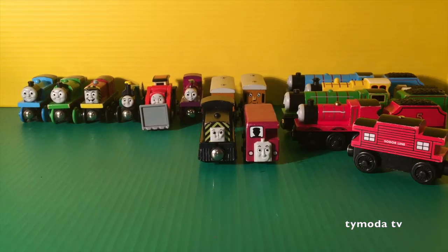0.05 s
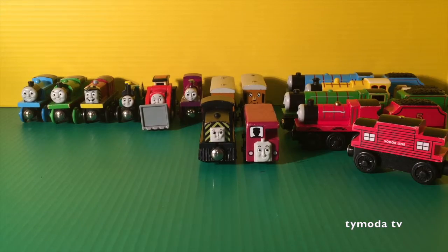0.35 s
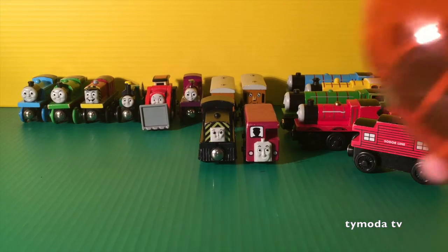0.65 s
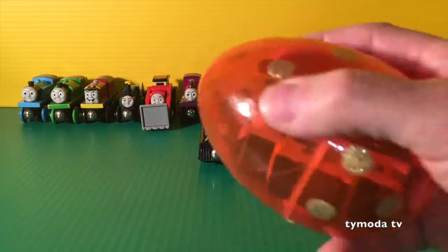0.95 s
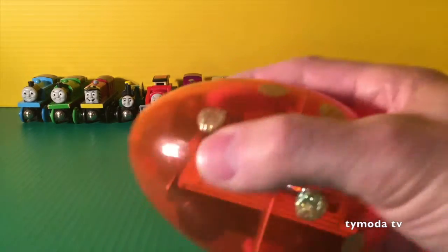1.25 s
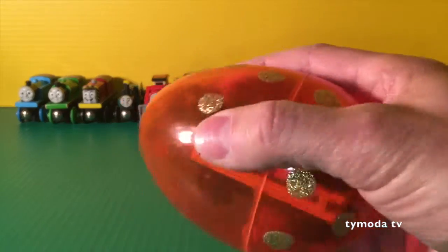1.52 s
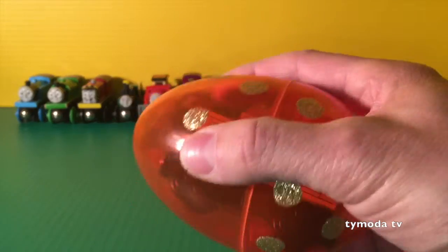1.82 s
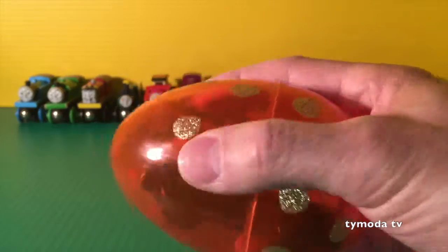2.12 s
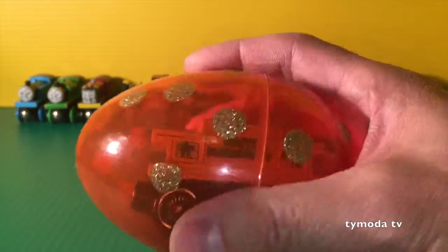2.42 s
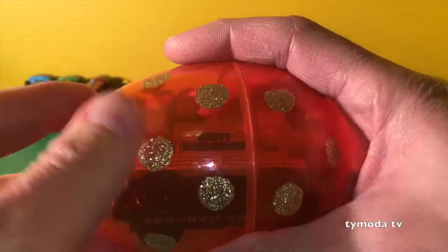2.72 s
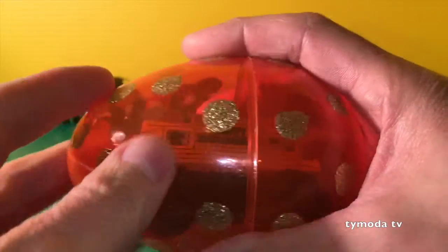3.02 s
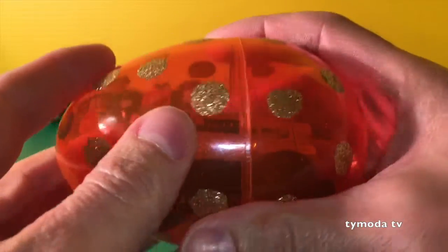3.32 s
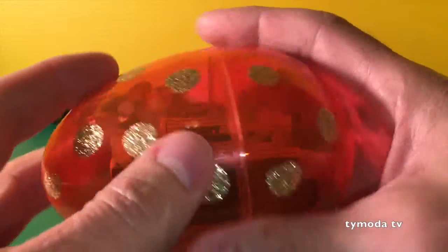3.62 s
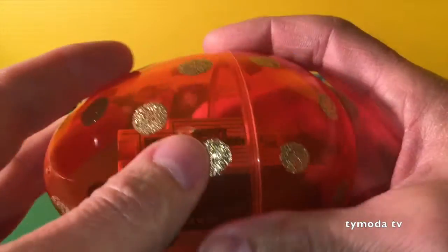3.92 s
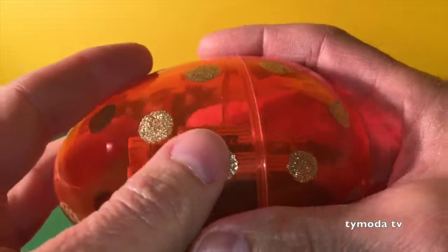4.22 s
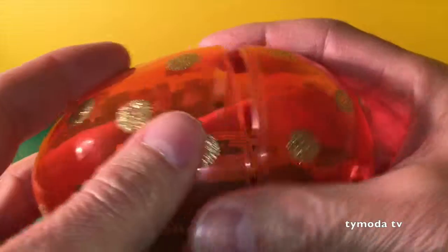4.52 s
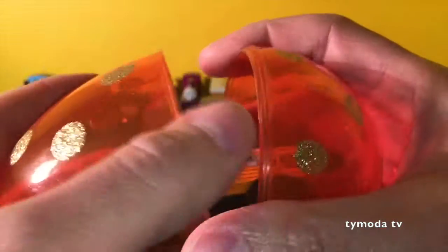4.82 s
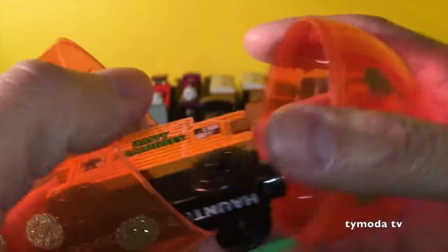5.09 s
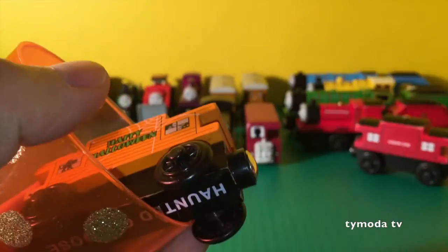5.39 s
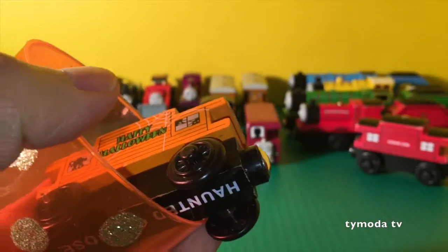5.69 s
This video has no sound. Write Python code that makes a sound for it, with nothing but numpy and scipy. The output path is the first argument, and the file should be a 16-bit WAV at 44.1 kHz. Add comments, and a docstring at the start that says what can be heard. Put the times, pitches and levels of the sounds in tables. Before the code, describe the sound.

A wooden toy car knocks a few times inside a large plastic egg, then rattles hard for about a second as the egg is shaken. Fingers slide quietly over the shell until the seam lets go with a thump and the halves separate with a hollow, rising pop and a second small pop. A few faint clicks follow. Everything is heard up close in a small room with a faint hum.

```python
"""Close by in a small, faintly humming room, fingers stroke a big plastic egg with a wooden toy car inside.
Hands shake it: the car lands on the hollow shell corner by corner, making it ring, and skids along it.
From about 2.7 s there is mostly the rub of skin on plastic, with a few soft knocks.
At 4.4 s the seam gives with a thump, then the halves part with a hollow rising pop.
Last, the car shifts as one half is taken away."""
import sys
import numpy as np
from scipy import signal
from scipy.fft import rfft, irfft
from scipy.io import wavfile

SR = 44100
rng = np.random.default_rng(int(sys.argv[2]) if len(sys.argv) > 2 else 0)


def store_wav(level_fs):
    """Save 16-bit WAV to argv[1]."""
    pcm = np.round(np.clip(np.atleast_2d(level_fs), -1, 1) * 32767)
    wavfile.write(sys.argv[1], SR, pcm.T.astype(np.int16))


N = 253575
TIME = np.arange(N) / SR
BLOW_TIME = TIME[:4096]   # the seconds within one short knock


def from_db(db):
    """Turn decibels into a number to multiply a sound by."""
    return 10 ** (np.asarray(db) / 20)


def rms_one(x):
    """Scale a sound so that its average strength (rms) is 1."""
    return x / np.sqrt(np.mean(x ** 2) + 1e-20)


def dying(t, t60):
    """A fade that loses 60 dB in t60 seconds, the fade time."""
    return np.exp(-np.log(1000) * t / t60)


def add(track, s, sound):
    """Mix a sound into the track, starting at s seconds."""
    at = int(np.clip(s * SR, 0, N - 1))
    track[at:at + len(sound)] += sound[:N - at]


def colour_filter(points):
    """A click with the given colour: (f/Hz, level/dB) points that say how strong each pitch is."""
    hz, db = np.transpose(points)
    size = len(BLOW_TIME)
    grid = np.maximum(np.fft.rfftfreq(size, 1 / SR), 1)
    skirts = np.minimum(grid / hz[0], 1) ** 2 * np.minimum(hz[-1] / grid, 1) ** 2
    gain = from_db(np.interp(np.log(grid), np.log(hz), db)) * skirts
    # pack the energy at the very start of the click (minimum phase)
    cepstrum = irfft(np.log(gain + 1e-4))
    return irfft(np.exp(rfft(2 * cepstrum[:size // 2], size)))


def coloured(x, points):
    """Give a sound a colour and an average strength of 1."""
    return rms_one(signal.fftconvolve(x, colour_filter(points))[:N])


def drift(per_s):
    """A wandering line that heads for a new random value per_s times a second."""
    return np.interp(TIME * per_s, np.arange(4000), rng.standard_normal(4000))


def swell(events, attack_s, release_s):
    """A loudness curve that rises, holds and fades for each (t/s, length/s, level/dB) event."""
    power = np.zeros(N)
    for s, length, db in events:
        t = np.arange(-6 * attack_s, length + 6 * release_s, 1 / SR)
        shape = np.exp(np.minimum(t, 0) / attack_s - np.maximum(t - length, 0) / release_s)
        add(power, s + t[0], (from_db(db) * shape) ** 2)
    return np.sqrt(power)


def unit_blows(blows):
    """Scale each blow so that its energy, spread over 5 ms, is 0 dB."""
    return blows / np.sqrt(np.sum(blows ** 2, axis=-1, keepdims=True) / (.005 * SR))


# colour of the quiet room: f/Hz, level/dB
ROOM_TONE = [(30, -12), (60, 1.5), (130, -2.5), (210, -1), (330, -13.5), (600, -22), (1500, -23.5),
             (4000, -28), (6500, -33.5), (16000, -36)]

def room_tone(noise_db=-69.5, hum_db=-72.5, hum_hz=120):
    """The room's low, steady rush, with a faint hum from the mains."""
    hum = from_db(hum_db) * rms_one(np.sin(2 * np.pi * hum_hz * TIME))
    return from_db(noise_db) * coloured(rng.standard_normal(N), ROOM_TONE) + hum


# colours of dull rubbing, of fingertips and of the palm on plastic: f/Hz, level/dB
RUB = [(100, -11.5), (280, 0.5), (650, 1), (1000, 4), (1700, -5), (2500, -11.5), (5000, -31.5)]
FINGERTIP_HISS = [(1000, -17), (2300, -4), (3200, 1.5), (4000, 0.5), (4900, 0), (6300, 1.5), (7600, -7.5),
                  (10500, -10.5), (16000, -14)]
PALM_HISS = [(1800, -22.5), (3300, -6), (4500, -9), (6000, 1.5), (8000, -3.5), (10500, -4.5), (13000, -2.5),
             (16000, -5.5)]
# skin slides over the egg: t/s, length/s, rub level/dB, hiss level/dB, palm's share of the hiss (0-1)
STROKES = [(0.071, 0.065, -67.5, -65, 0), (0.168, 0.13, -66.5, -80, 0.3), (0.464, 0.051, -60, -68, 0),
           (0.563, 0.23, -56, -62.5, 0), (0.902, 0.035, -69, -71, 0), (1.231, 0.073, -54.5, -62.5, 0),
           (1.324, 1.13, -52, -57, 0), (2.518, 0.15, -60.5, -58, 0.12), (2.723, 0.078, -59, -67, 0),
           (2.888, 0.028, -56.5, -59, 0.1), (2.968, 0.047, -55, -56, 0.35), (3.029, 0.073, -63.5, -62.5, 0),
           (3.159, 0.042, -64.5, -54.5, 0.32), (3.225, 0.11, -62, -61.5, 0.1),
           (3.504, 0.038, -59.5, -55, 0), (3.624, 0.18, -63, -56.5, 0.06), (3.83, 0.055, -56.5, -56.5, 0.1),
           (3.948, 0.014, -62.5, -51, 0.18), (4.05, 0.011, -60.5, -54, 0.02),
           (4.392, 0.056, -54.5, -69, 0.06), (4.64, 0.047, -54.5, -53, 0), (4.874, 0.021, -71, -61, 0.4),
           (4.952, 0.038, -65, -61, 0.02), (5.198, 0.053, -63.5, -59, 0.11), (5.271, 0.16, -76.5, -58.0, 1),
           (5.727, 0.04, -58, -59.5, 0)]

def fingers(rub_rough_db=4, hiss_rough_db=2, catch_db=3):
    """Fingertips stick and slip in tiny grains; the flat palm glides with a finer, brighter hiss."""
    s, length, rub_db, hiss_db, palm_share = np.transpose(STROKES)
    palm_share = np.clip(palm_share, 1e-6, 1 - 1e-6)
    tips_db = hiss_db + 10 * np.log10(1 - palm_share)
    palm_db = hiss_db + 10 * np.log10(palm_share)
    rub_gain, tips_gain, palm_gain = (swell(zip(s, length, db), attack_s=.0055, release_s=.016)
                                      for db in (rub_db, tips_db, palm_db))
    # the hands never lie quite still, so a little rub and hiss is always there
    rub_gain = np.hypot(rub_gain, from_db(-78.5))
    tips_gain = np.hypot(tips_gain, from_db(-81))
    rub = coloured(rng.standard_normal(N) * from_db(rub_rough_db * drift(280)), RUB)
    grains = rng.standard_normal(N) * from_db(hiss_rough_db * drift(700) + catch_db * drift(90))
    tips = coloured(grains, FINGERTIP_HISS)
    palm = coloured(rng.standard_normal(N), PALM_HISS)
    skin = rub_gain * rub + tips_gain * tips + palm_gain * palm
    # a bounce off the cupped hand, whose path keeps changing, shifts the colour
    bounce_s = .0005 * from_db(1.5 * drift(5))
    return skin + .4 * np.interp(TIME - bounce_s, TIME, skin)


def damped_tones(tones, scatter_db, soft_hz, detune=.08):
    """One short ring per knock; the spot hit and the hand's grip change each tone's level and pitch."""
    ring = 0
    for hz, db, t60 in tones:
        chance = rng.standard_normal((len(KNOCKS), 2))
        pitch = hz * (1 + detune * chance[:, :1])
        gain = from_db(db + scatter_db * chance[:, 1:])
        ring = ring + gain * np.sin(2 * np.pi * pitch * BLOW_TIME) * dying(BLOW_TIME, t60)
    # a small body sounds by changing speed; the time the contact takes rounds the edge
    soften = signal.butter(2, [58, soft_hz], "band", fs=SR, output="sos")
    return signal.sosfilt(soften, np.diff(ring, prepend=0))


def cracks(points, t60, snap, scatter_db=2.5):
    """One crack per knock: a sharp edge, then a blur of shell tones, coloured anew by each spot hit."""
    bursts = rng.standard_normal((len(KNOCKS), len(BLOW_TIME))) * dying(BLOW_TIME, t60)
    bursts[:, 0] += snap
    hz, db = np.transpose(points)
    colours = db + scatter_db * rng.standard_normal((len(KNOCKS), len(hz)))
    return np.array([signal.fftconvolve(burst, colour_filter(np.c_[hz, colour]))[:len(BLOW_TIME)]
                     for burst, colour in zip(bursts, colours)])


# tones of the whole egg, muffled by the palm, and of the air inside: f/Hz, level/dB, fade time/s
EGG_TONES = [(112, -11, 0.07), (216, -6.5, 0.0083), (281.3, 2, 0.026), (367, 4, 0.0085)]
AIR_TONES = [(608, 4.5, 0.039), (680, 2, 0.011), (888, 4, 0.014), (1116, -5.5, 0.037)]
# colours of the shell's clack and of the hard tick: f/Hz, level/dB
CLACK = [(800, -2), (1250, -2), (1500, 1), (1900, -3.5), (2400, -4.5), (2850, -2.5), (3400, -10),
         (4000, -13.5), (5200, -22.5)]
TICK = [(2800, -23.5), (4000, -4), (4800, 0.5), (5900, 2), (7000, -3.5), (8300, -7), (10500, -14.5),
        (13200, -14), (16000, -17.5)]

def corner_hits():
    """One corner of the car hits the shell: a thud, hollow knock, clack and tick for every knock."""
    thud = damped_tones(EGG_TONES, scatter_db=3, soft_hz=800)
    hollow = damped_tones(AIR_TONES, scatter_db=3.5, soft_hz=1900)
    clack = cracks(CLACK, t60=.02, snap=3)
    tick = cracks(TICK, t60=.017, snap=2)
    return unit_blows(np.array([thud, hollow, clack, tick]))


def landing(first, second, graze_db=-5.5):
    """One corner grazes the shell and the other follows with the car's weight."""
    lags = [int(delay * SR) for _, delay, *_ in KNOCKS]
    late = np.array([np.pad(blow, (lag, 0))[:len(BLOW_TIME)] for blow, lag in zip(second, lags)])
    return unit_blows(from_db(graze_db) * first + late)


# middle pitches of the thud, hollow knock, clack and tick: f/Hz
PART_HZ = [250, 750, 2100, 6500]
# the car lands on the shell: t/s, wait for the second corner/s,
# thud level/dB, hollow knock level/dB, clack level/dB, tick level/dB, ring of the spot hit f/Hz
KNOCKS = [(0.126,0.0031,-51.5,-55,-55.5,-62,548), (0.472,0.0029,-45,-47,-50,-51.5,790),
          (0.5536,0.0096,-42,-38,-30,-36.5,1620), (0.6304,0.0011,-34.5,-33.5,-23,-32.5,2250),
          (0.644,0.0014,-41,-35.5,-42,-39.5,1000), (0.6659,0.0014,-27.5,-36.5,-40,-44,590),
          (0.7044,0.0028,-33.5,-33,-39,-50,498), (0.739,0.0069,-50.5,-41.5,-42.5,-44.5,1320),
          (1.264,0.0035,-53.5,-54.5,-49,-48,5800), (1.317,0.0071,-53.5,-34.5,-21.5,-20.5,6330),
          (1.3471,0.0012,-34.5,-26,-28,-33,3040), (1.357,0.0057,-29,-25.5,-24.5,-27.5,1660),
          (1.427,0.001,-38,-41.5,-50,-45,615), (1.438,0.0046,-20,-13,-21.5,-18,883),
          (1.5173,0.0028,-26.5,-24.5,-29,-28.5,1960), (1.528,0.00097,-32.5,-29,-31.5,-33.5,1900),
          (1.5965,0.0053,-27,-21.5,-17.5,-17.5,1106), (1.6046,0,-30,-24,-29.5,-22,6020),
          (1.6711,0.00035,-25.5,-20.5,-23.5,-22.5,1070), (1.7505,0,-31,-34.5,-45.5,-37.5,5500),
          (1.7647,0.0021,-19.5,-16,-19,-17,5950), (1.8253,0.0004,-20.5,-22.5,-30.5,-30.5,630),
          (1.836,0.00024,-32.5,-27,-39,-34.5,620), (1.9193,0.0026,-23,-20.5,-28,-23,5550),
          (1.973,0.009,-39,-29.5,-26.5,-32.5,1430), (2.0014,0.0018,-17,-17.5,-19,-23,657),
          (2.032,0,-48.5,-42.5,-32,-37.5,1410), (2.091,0.0035,-22.5,-24,-24,-23,764),
          (2.13,0.0078,-48,-34.5,-32.5,-44,1700), (2.1642,0.003,-18,-18,-23.5,-24.5,618),
          (2.192,0.0029,-49.5,-44.5,-33,-33,5250), (2.259,0.0015,-25.5,-27,-24.5,-26,960),
          (2.268,0.003,-30.5,-26,-32,-36.5,950), (2.305,0.004,-42.5,-31.5,-26,-31.5,1620),
          (2.334,0.0001,-18,-18.5,-22.5,-28,652), (2.4295,0.0018,-36,-28.5,-40.5,-36,610),
          (2.4694,0.0033,-52,-43,-46.5,-54,1170), (2.592,0.0061,-33,-34.5,-42,-41,1140),
          (2.609,0.0026,-49,-41,-44,-47,1230), (2.724,0.0051,-28,-32,-46,-44.5,1425),
          (3.701,0.000015,-42,-45,-36,-69,2570), (3.73,0.0021,-42.5,-47.5,-67,-70,604),
          (3.756,0.0012,-41,-44.5,-52,-50,1600), (3.77,0.0032,-45,-49,-46,-54,6260),
          (3.917,0.0028,-58,-47.5,-51,-74,1790), (4.42,0.0014,-32,-36.5,-36,-44.5,3780),
          (4.979,0.0035,-46.5,-52,-60,-54,930), (5.208,0.0015,-68,-64,-46.5,-48.5,3310),
          (5.228,0.0008,-59,-53.5,-48,-51,1360), (5.715,0.0011,-54,-70,-55.5,-53,4100)]

def knocks(ring_db=-2):
    """Each knock is a landing on two corners, and the spot hit rings at a pitch of its own."""
    landings = [landing(first, second) for first, second in zip(corner_hits(), corner_hits())]
    track = np.zeros(N)
    for (s, delay, *levels, hz), parts in zip(KNOCKS, np.stack(landings, axis=1)):
        add(track, s, from_db(levels) @ parts)   # the four parts, each at its own level
        t60 = .027 * (1000 / hz) ** .4   # higher rings die sooner
        ring = unit_blows(np.sin(2 * np.pi * hz * BLOW_TIME) * dying(BLOW_TIME, t60))
        db_at_pitch = np.interp(np.log(hz), np.log(PART_HZ), levels)
        add(track, s + delay, from_db(db_at_pitch + ring_db) * ring)
    return track


def chatter(blows, per_s=380, settle_s=.0058, level_db=-16):
    """After each blow the car skitters over the shell in tiny uneven touches that soon settle."""
    treble = signal.sosfilt(signal.butter(2, 1200, "high", fs=SR, output="sos"), blows)
    keep = np.exp(-1 / (settle_s * SR))
    unrest = np.sqrt(signal.lfilter([1 - keep], [1, -keep], treble ** 2 + 1e-18))
    touches = (rng.random(N) < per_s / SR) * rng.standard_normal(N)
    return from_db(level_db) * unrest * (coloured(touches, CLACK) + coloured(touches, TICK))


# pitches at which the thin shell rings: f/Hz
SHELL_HZ = [615, 973, 1422, 1711, 2252, 2842, 2968, 3517, 3922, 4590, 5480, 6020, 6500, 7182, 8171, 9119,
            9515, 12543, 13027]

def shell_ring(blows, level_db=-7.5, db_per_octave=3.5, t60=.085):
    """The shell's own tones take up each blow and ring on, the higher ones a little more strongly."""
    t = TIME[:SR // 4]
    gains = from_db(level_db + db_per_octave * np.log2(SHELL_HZ / np.median(SHELL_HZ)))
    tones = sum(gain * np.cos(2 * np.pi * hz * t) for gain, hz in zip(gains, SHELL_HZ))
    fade = dying(t, t60)
    return signal.fftconvolve(blows, 2 * tones * fade / fade.sum())[:N]


# the car slides along the shell: t/s, length/s, level/dB
SKIDS = [(0.547,0.0099,-43), (0.621,0.0066,-45), (0.636,0.018,-37), (1.366,0.017,-34.5), (1.455,0.02,-38.5),
         (1.535,0.028,-44), (1.612,0.02,-41.5), (1.677,0.0038,-27.5), (1.692,0.016,-38),
         (1.778,0.039,-32.5), (1.858,0.02,-37.5), (1.926,0.007,-27), (1.986,0.016,-27),
         (2.099,0.0071,-33.5), (2.149,0.017,-29), (2.273,0.006,-36), (2.317,0.014,-38),
         (2.435,0.0043,-38.5)]

def skids(touches_per_s=800):
    """Wheels and edges scrape along the shell in a dense run of tiny touches."""
    touches = (rng.random(N) < touches_per_s / SR) * rng.choice([-1, 1], N) * rng.uniform(.3, 1, N)
    scrape = sum(from_db(db) * coloured(touches, colour)
                 for db, colour in [(-6, RUB), (-2.5, CLACK), (-6.5, TICK)])
    return swell(SKIDS, attack_s=.00095, release_s=.0028) * scrape


# the seam gives way: t/s, level/dB, f/Hz, fade time/s, swell time/s
POPS = [(4.4202, -18, 160, 0.051, 0.004), (4.426, -23.5, 94.4, 0.064, 0.0037),
        (4.6635, -18.5, 727, 0.034, 0.0027), (4.9782, -20.5, 915, 0.018, 0.00083),
        (4.988, -34, 974, 0.031, 0.00054)]

def seam_pops():
    """The seam lets go with a low thump, then soft higher pops, each made of quickly fading tones."""
    track = np.zeros(N)
    for s, db, hz, t60, swell_s in POPS:
        shape = dying(BLOW_TIME, t60) * (1 - np.exp(-BLOW_TIME / swell_s))
        add(track, s, from_db(db) * np.sin(2 * np.pi * hz * BLOW_TIME) * shape)
    return track


# the rims catch on each other and on the car: t/s, level/dB
CATCHES = [(4.656, -41.5), (4.70, -57), (4.765, -56), (4.881, -56.5), (4.985, -45), (5.045, -62)]

def parting_rims(parting_s=4.645, shut_hz=520, open_hz=986, rise_s=.055, slips_per_s=450, air_t60=.011):
    """The rims catch in tiny slips and sound the air inside, whose pitch rises as the gap widens."""
    hz = open_hz + (shut_hz - open_hz) * np.exp(-np.maximum(TIME - parting_s, 0) / rise_s)
    phase = 2 * np.pi * np.cumsum(hz) / SR
    slips = (rng.random((2, N)) < slips_per_s / SR) * rng.standard_normal((2, N))
    puff = dying(BLOW_TIME, air_t60) - dying(BLOW_TIME, air_t60 / 4)
    puffs = signal.fftconvolve(slips, puff[None], axes=1)[:, :N]
    air = rms_one(puffs[0] * np.cos(phase) + puffs[1] * np.sin(phase))
    return air * swell([(s, 0, db) for s, db in CATCHES], attack_s=.016, release_s=.028)


def room_echo(x, level_db=-15, t60=.24, build_s=.0073):
    """Echoes from the walls build up quickly and die away, with little bass and softened treble."""
    t = TIME[:SR // 2]
    tail = rng.standard_normal(len(t)) * dying(t, t60) * (1 - np.exp(-(t / build_s) ** 2))
    walls = signal.butter(2, [220, 7500], "band", fs=SR, output="sos")
    echo = signal.sosfilt(walls, tail / np.linalg.norm(tail))
    return from_db(level_db) * signal.fftconvolve(x, echo)[:N]


def scene():
    """Car, fingers and seam sound through the egg, over a quiet room."""
    blows = knocks()
    car = blows + chatter(blows) + skids()
    egg = car + shell_ring(car) + fingers() + seam_pops() + parting_rims()
    return (room_tone() + egg + room_echo(egg))[None]


def record(dry, low_cut_hz=48, ceiling=.6, high_cut_hz=16200):
    """The microphone drops the deep bass, the loudest peaks are rounded, the highest treble is cut."""
    heard = signal.sosfilt(signal.butter(3, low_cut_hz, "high", fs=SR, output="sos"), dry)
    rounded = ceiling * np.tanh(heard / ceiling)
    return signal.sosfilt(signal.ellip(10, .1, 80, high_cut_hz, fs=SR, output="sos"), rounded)


dry = scene()
out = record(dry)
store_wav(out)
```